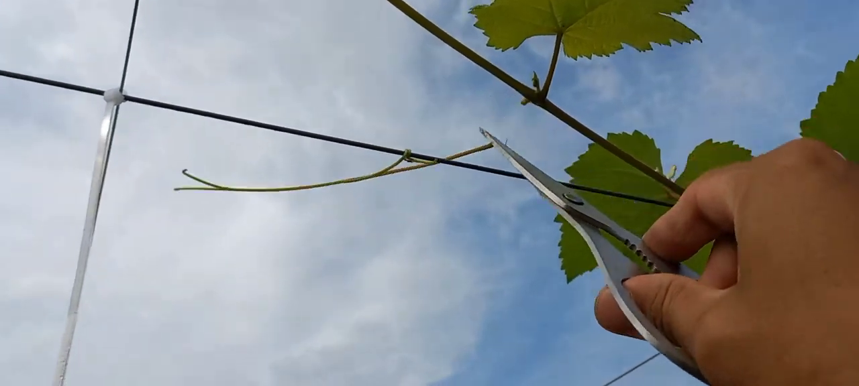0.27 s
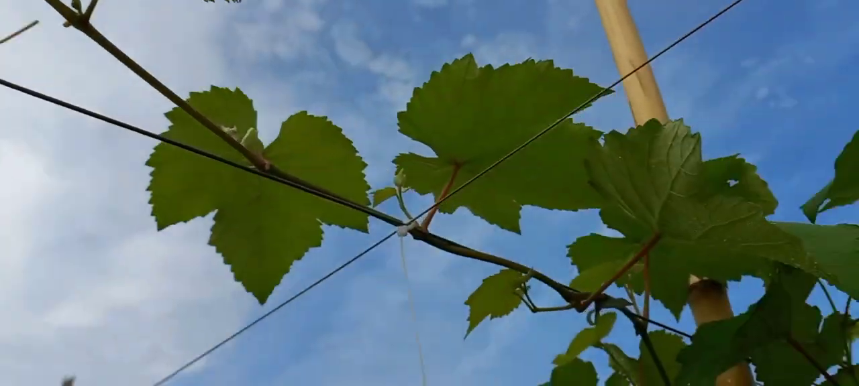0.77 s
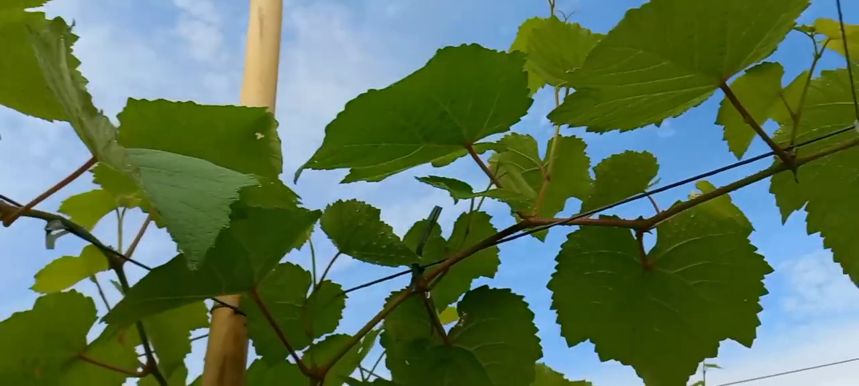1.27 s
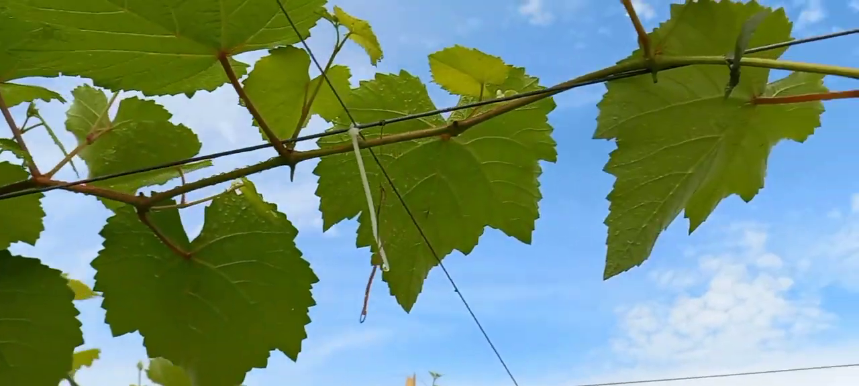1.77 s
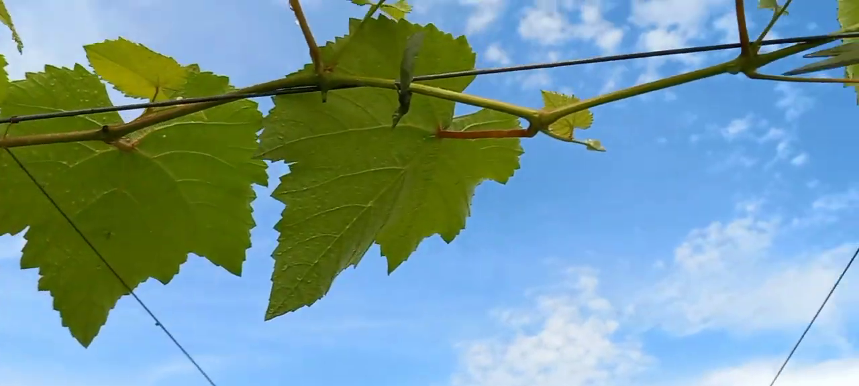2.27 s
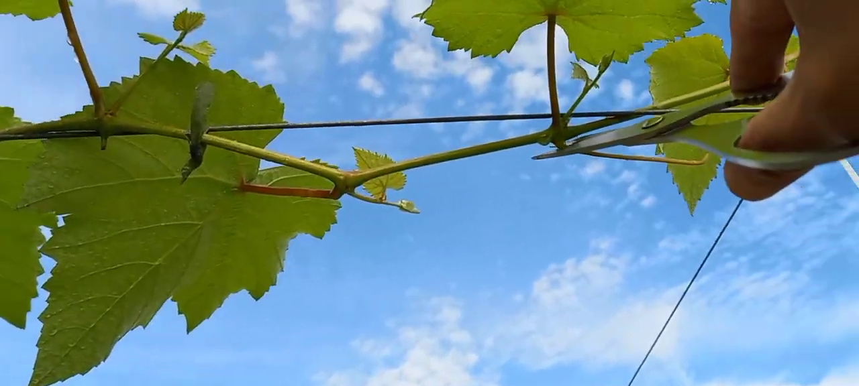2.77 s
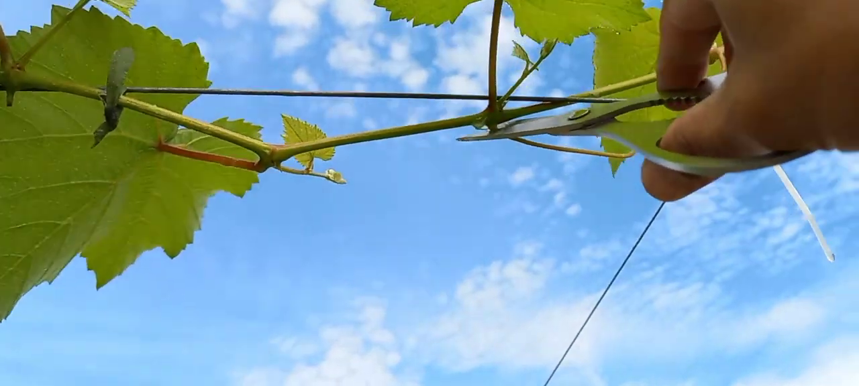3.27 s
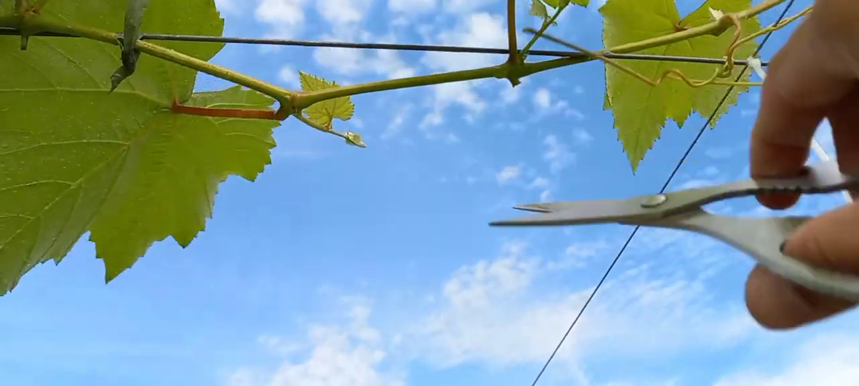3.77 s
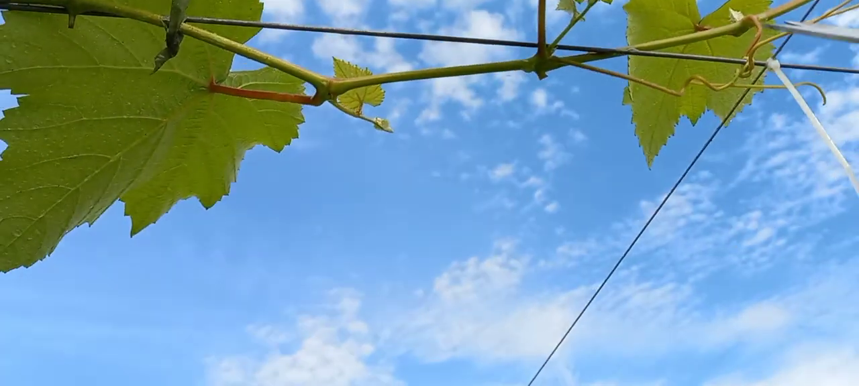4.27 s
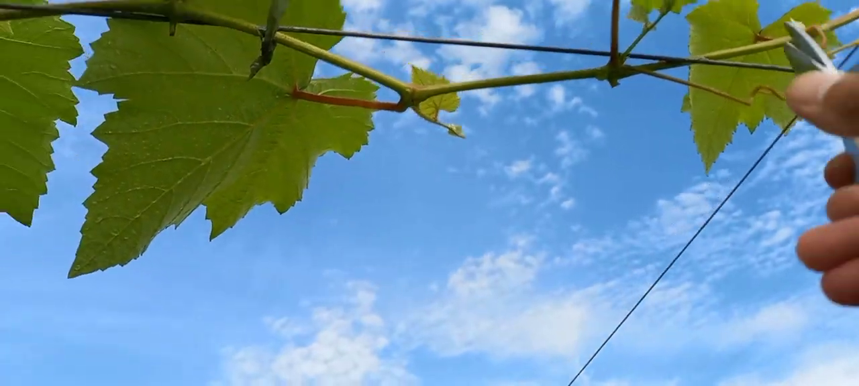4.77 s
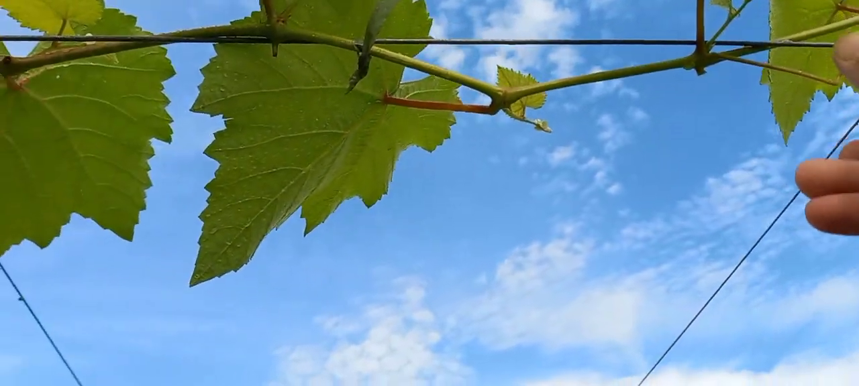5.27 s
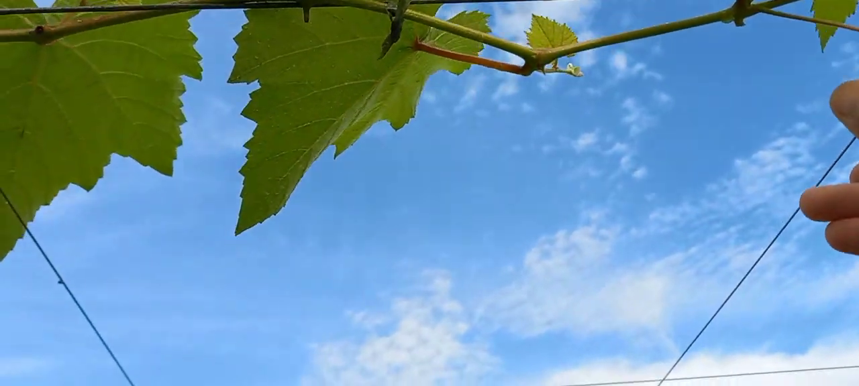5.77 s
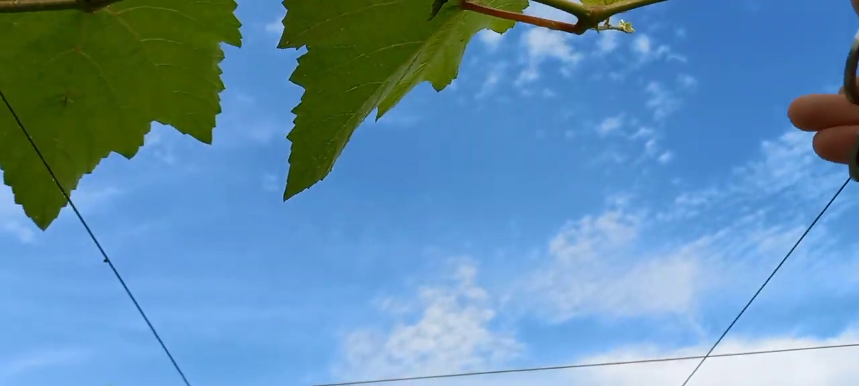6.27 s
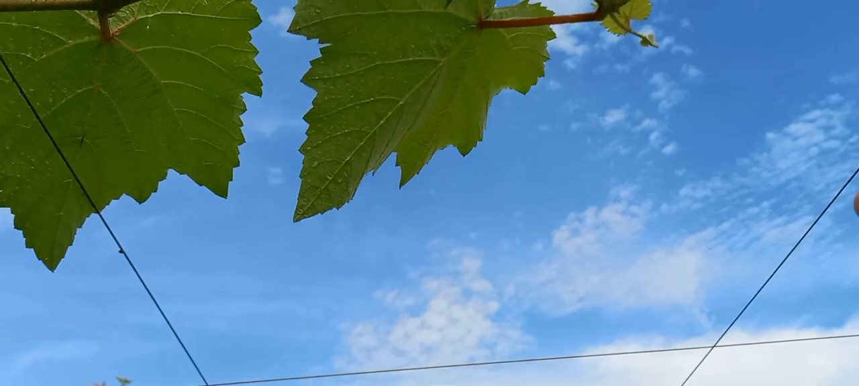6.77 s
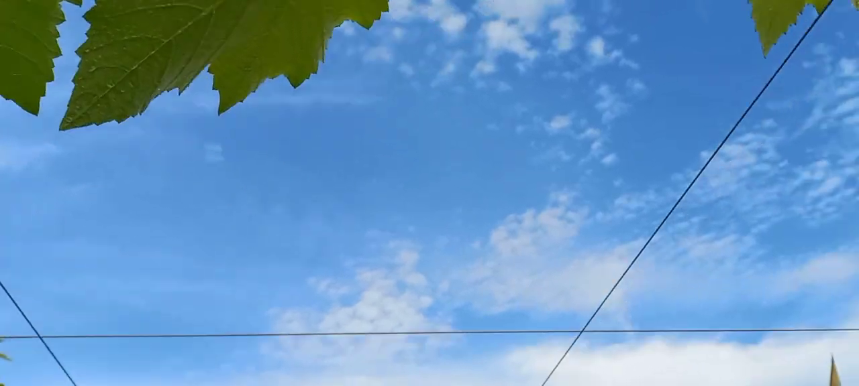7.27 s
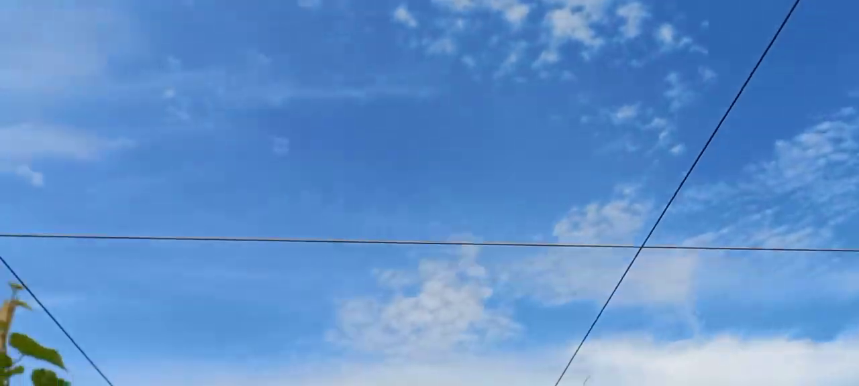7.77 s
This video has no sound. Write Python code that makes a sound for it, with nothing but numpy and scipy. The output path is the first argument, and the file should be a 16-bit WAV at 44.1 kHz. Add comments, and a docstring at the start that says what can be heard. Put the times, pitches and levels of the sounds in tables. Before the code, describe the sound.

Small steel pruning shears work close to the microphone, mostly on the right, outdoors among vines. A quick run of bright, ringing snips and blade scrapes opens, with handle knocks and dull stem thuds. One more sharp snip falls in a quieter middle stretch, where faint birds trill and chip. Then a second busy run of snips and scrapes follows. Leaves rustle now and then over a low rumble, breeze and insect hiss.

```python
"""Pruning shears among the vines

Small steel shears work close by, mostly on the right: the blades rub, bite and snap shut with a bright
ring, the handles knock, the cane thuds and the pivot squeaks. Brushed leaves rustle now and then.
One bird churrs hoarsely far off, a nearer one trills and chips, and a cricket chirps twice.
Behind it all, faint whistles drift over a low rumble, a breeze and the hiss of insects."""
import sys
import numpy as np
from scipy import signal
from scipy.fft import rfft, irfft, next_fast_len
from scipy.io import wavfile
from scipy.ndimage import uniform_filter1d, map_coordinates

SR = 44100
rng = np.random.default_rng(int(sys.argv[2]) if len(sys.argv) > 2 else 0)


def master_out(mix):
    """Clip the mix to full scale and print it as 16-bit PCM to the path in sys.argv[1]."""
    frames = np.transpose(np.atleast_2d(mix))
    ceiling = np.clip(frames, -1, 1)
    pcm = np.round(ceiling * 32767).astype(np.int16)
    wavfile.write(sys.argv[1], SR, pcm)


N = 353461
PADDED = N + 2 * SR  # a track with a spare second at each end
RIGHT_LAG = 17  # samples by which a sound from the far right reaches the left ear later

# Where the shears are. Each row: time in seconds, treble balance (left minus right) in dB.
SHEARS_PAN = [(.16, -3), (.6, -11.5), (1.4, -23), (2.67, -10.5), (3.56, -3), (4.8, 2.5), (6.48, -6),
              (6.85, -8), (7.05, -15), (7.6, -9.5), (8, -5)]
# The bright colour of foliage. Each row: frequency in Hz, level in dB.
LEAF_SPECTRUM = [(2500, -11), (4500, -10), (9000, -11), (12000, -7.5), (13600, -6.5), (15500, -23.5),
                 (16500, -28)]


def amp(db):
    """Decibels to gain."""
    return 10 ** (np.asarray(db) / 20)


def unit(x):
    """Scaled to rms 1."""
    return x / np.sqrt(np.mean(x ** 2) + 1e-30)


def crest(x):
    """Scaled so that the loudest 4 ms have rms 1."""
    return x / np.sqrt(np.max(uniform_filter1d(x ** 2, size=SR // 250)))


def eq(points):
    """Gain against frequency, drawn through (Hz, dB) points on a log axis."""
    hz, db = np.transpose(points)
    return lambda f: amp(np.interp(np.log(f + 1), np.log(hz + 1), db))


def fader(points):
    """A level for every sample, drawn through (seconds, dB) points."""
    return np.interp(np.arange(N) / SR, *np.transpose(points))


def wobble(rate, count=N):
    """A smooth random curve, rate knots a second."""
    knots = rng.standard_normal(int(count * rate / SR) + 4)
    return map_coordinates(knots, [np.arange(count) * rate / SR])


def sine(hz):
    """A tone that follows a pitch curve."""
    return np.sin(2 * np.pi * np.cumsum(hz) / SR)


def filtered(x, response):
    """x shaped by a complex response of frequency."""
    size = next_fast_len(x.shape[-1] + 4096)
    return irfft(rfft(x, size) * response(np.fft.rfftfreq(size, 1 / SR)), size)[..., :x.shape[-1]]


def ringing(modes, scatter_db=2):
    """Response of (Hz, width in Hz, dB) resonances, each excited at a random strength."""
    hz, width, db = np.transpose(modes)[:, :, None]
    polarity = (-1) ** np.arange(len(modes))[:, None]
    gain = polarity * amp(db + scatter_db * rng.standard_normal(db.shape))
    return lambda f: np.sum(gain * 1j * f * width / (hz * hz - f * f + 1j * f * width), axis=0)


def add(out, x, s, pan_db, lag, blur):
    """Mixes x into a padded track at s seconds; the left gets pan_db, lag samples and some scatter."""
    taps = np.r_[1, blur * rng.standard_normal(40) * amp(-np.arange(40) * .6)]
    left = np.convolve(x, taps / np.linalg.norm(taps))[:len(x)]
    start = round(s * SR) + SR
    out[0, start + round(lag):][:len(x)] += left * amp(pan_db)
    out[1, start:][:len(x)] += x


def rush(spectrum, alike, patchy_db):
    """Stereo noise with patches of random gain; the share alike in both ears comes from the right."""
    shape = (3, 257, N // 256 + 3)
    grains = rng.standard_normal(shape) + 1j * rng.standard_normal(shape)
    patches = uniform_filter1d(rng.standard_normal(shape[1:]), size=6, axis=0)
    patches = unit(uniform_filter1d(patches, size=12, axis=1))
    both, left, right = signal.istft(grains * amp(patchy_db * patches), nperseg=512)[1][:, :N]
    shared = np.sqrt(alike) * np.array([np.roll(both, RIGHT_LAG), both])
    diffuse = np.sqrt(1 - alike) * np.array([left, right])
    return unit(filtered(shared + diffuse, eq(spectrum)))


def open_air():
    """The bed: a near-mono rumble, a wide, gently gusting breeze and a smooth far hiss."""
    # The rumble's rise and fall. Each row: time in seconds, level in dB.
    rumble_levels = [(0.0, -60.5), (0.29, -58.5), (1.25, -61.5), (1.43, -66.5), (2.27, -60), (2.94, -66.5),
                     (3.34, -56.5), (6.91, -60), (8.01, -60.5)]
    # The colours of the three layers. Each row: frequency in Hz, level in dB.
    rumble_spectrum = [(21, -51.5), (35, -25), (79, -1), (97, 2.5), (112, -1), (193, -17), (242, -31.5),
                       (330, -25.5), (430, -46), (730, -120)]
    breeze_spectrum = [(120, -19), (200, -4.5), (374, -15.5), (457, -15), (1270, -22.5), (1550, -23.5),
                       (2150, -27), (6000, -42.5), (13200, -120)]
    hiss_spectrum = [(1760, -46), (3300, -8), (4850, -9.5), (6160, -13.5), (7560, -6.5), (9210, -11.5),
                     (14900, -7.5), (15700, -13), (16200, -23)]
    lean_right_db = [[-.8], [.8]]
    rumble_db = fader(rumble_levels) + .6 * wobble(4.7) + lean_right_db
    rumble = amp(rumble_db) * rush(rumble_spectrum, alike=.96, patchy_db=2.5)
    breeze_db = -74 + .8 * wobble(1.5) + lean_right_db
    breeze = amp(breeze_db) * rush(breeze_spectrum, alike=.23, patchy_db=2)
    hiss = amp(-82 + 2.3 * wobble(.678)) * rush(hiss_spectrum, alike=.051, patchy_db=.8)
    return rumble + breeze + hiss


def insects():
    """A chorus of insects blurs into one high, fluttering band of noise."""
    # The chorus swells. Each row: time in seconds, level in dB.
    levels = [(0, -82), (2.8, -84), (4.7, -82), (4.95, -77.5), (5.12, -80.5), (5.3, -83), (6.5, -83),
              (7.35, -78), (8.01, -77)]
    # Its band. Each row: frequency in Hz, level in dB.
    spectrum = [(5600, -42.5), (6300, -9.5), (6900, -8.5), (7500, -4.5), (8000, -12), (8700, -13),
                (9200, -43)]
    return amp(fader(levels) + 1.5 * wobble(70)) * rush(spectrum, alike=.39, patchy_db=.8)


def whistles():
    """Thin tones from far away on the right, wavering in level and pitch."""
    # Each row: start in seconds, length in seconds, pitch in Hz, level in dB.
    tones = [(-.15, .4, 950, -77), (1.5, .38, 1600, -77), (2.42, .28, 1110, -79), (3.5, 2, 1028, -83),
             (4.1, 1.4, 1109, -83), (6.25, .2, 1900, -79)]
    out = np.zeros((2, PADDED))
    for s, length, hz, db in tones:
        n = int(length * SR)
        pitch = hz * (1 + .016 * wobble(80, n))
        swell = np.sin(np.pi * np.arange(n) / n) * amp(db + 3 * wobble(12, n))
        add(out, np.sqrt(2) * swell * sine(pitch), s, pan_db=-9, lag=13, blur=.05)
    return out[:, SR:-SR]


def leaves():
    """Leaves brushed by hand or tendril: a bright hiss and a duller rustle swell together."""
    # Each row: start in seconds, length in seconds, hiss level in dB, rustle level in dB.
    brushes = [(0.14, 0.39, -67, -64.5), (0.876, 0.32, -75, -90), (1.38, 0.37, -82.5, -89),
               (4.19, 0.33, -72.5, -81), (4.79, 0.13, -72, -70.5), (5.3, 0.25, -106, -78.5),
               (6.456, 0.14, -67, -68.5), (6.9, 1.46, -73, -99.5)]
    # The dull colour of twigs. Each row: frequency in Hz, level in dB.
    twig_spectrum = [(200, -3), (450, 2.5), (1100, 5.5), (1700, -8), (3000, -40.5), (5000, -51)]
    t = np.arange(N) / SR
    hiss_gain = rustle_gain = 0
    for s, length, hiss_db, rustle_db in brushes:
        swell = np.sin(np.pi * np.clip((t - s) / length, 0, 1) ** .6) ** .9  # quick rise, slow fade
        hiss_gain += amp(hiss_db) * swell
        rustle_gain += amp(rustle_db) * swell
    hiss = hiss_gain * amp([[-2.5], [1.5]]) * rush(LEAF_SPECTRUM, alike=.073, patchy_db=-5.5)
    return hiss + rustle_gain * rush(twig_spectrum, alike=.47, patchy_db=2)


def blades(pushes, edge_db, scatter_db, tilt_db, damping=1):
    """Steel answers noisy pushes, each at another spot, with a ring and an unpitched edge."""
    # The blades' resonances. Each row: frequency in Hz, width in Hz, level in dB.
    steel_modes = [(4620, 140, -28.5), (5560, 110, -27.5), (6630, 79, -17), (7356, 400, -16.5),
                   (8925, 120, -10.5), (9750, 170, -9.5), (11330, 97, -1.5), (12160, 200, -7),
                   (12920, 200, -9), (14000, 120, -5.5), (14500, 180, -10), (15080, 180, -16.5)]
    # The unpitched edge. Each row: frequency in Hz, level in dB.
    edge_spectrum = [(1500, -46.5), (3200, -41.5), (5000, -32.5), (8000, -34), (12000, -11.5), (14600, -11),
                     (16200, -25.5)]
    edge, sound = eq(edge_spectrum), 0
    for push in pushes:
        ring = ringing(steel_modes * np.array([1, damping, 1]), scatter_db)
        sound += filtered(
            push, lambda f: (ring(f) + amp(edge_db) * edge(f)) * amp(tilt_db * np.log2(f + 2000)))
    return crest(sound)


def snaps():
    """The blades meet: steel rings over a dry crack, the handles knock and the cane thuds."""
    # Each row: time in seconds, ring level in dB, knock level in dB, thud level in dB, knock pitch in Hz.
    hits = [(0.155, -40, -67, -65, 2210), (0.162, -24.5, -38, -42.5, 2090), (0.2248, -52.5, -80, -65, 2300),
            (0.663, -19, -44, -89, 2080), (0.861, -24, -77, -65, 2300), (.901, -27, -47, -78, 2320),
            (1.074, -44.5, -69, -69.5, 2300), (1.1091, -19, -37.5, -59, 2400),
            (2.672, -88, -61.5, -76, 1780), (3.562, -16.5, -36, -42, 1972), (4.009, -76, -73.5, -71, 2310),
            (4.8042, -68.5, -66, -56.5, 2030), (6.4796, -17.5, -54, -47.5, 2290),
            (6.819, -51.5, -68, -71, 2280), (7.062, -33.5, -45, -50, 1880), (7.083, -14.5, -40, -55, 2600),
            (7.283, -18, -44, -88, 2450), (7.465, -43.5, -81, -62, 2300), (7.6209, -29, -74.5, -86.5, 2290),
            (7.995, -31.5, -79, -65.5, 2280)]
    # The handles' resonances. Each row: pitch and width as multiples of the knock pitch, level in dB.
    handle_modes = [(.7, .22, -16), (1, .13, 0), (1.55, .4, -15)]
    # Resonances of hand and cane. Each row: frequency in Hz, width in Hz, level in dB.
    cane_modes = [(223.3, 77, -1.5), (756, 350, -0.5), (1200, 220, 0.5)]
    crack_colour = eq([(3000, -20), (5000, -13), (8000, -2), (11000, -20.5)])
    out, t = np.zeros((2, PADDED)), np.arange(SR // 8) / SR
    for s, ring_db, knock_db, thud_db, knock_hz in hits:
        pan_db = np.interp(s, *np.transpose(SHEARS_PAN))
        lag = -pan_db  # farther to the right: later on the left
        low_pan_db = .35 * pan_db  # lower tones bend round to the far ear
        cut = thud_db > ring_db - 30  # a stem between the blades dulls the ring and broadens the knock
        blow = amp(-60 * np.clip(t - .001, 0, None) / .01) * (1 - np.exp(-t / .0004))  # 1 ms of contact
        shiver = amp(-24 - 60 * t / .05 + 3 * wobble(300, len(t)))  # loose parts shake on
        push = (blow + shiver) * rng.standard_normal((2, len(t)))
        crack = crest(filtered(push[1], crack_colour))
        crack *= amp(ring_db - 21) + amp(thud_db + 4)  # crunchier when the cane is hit
        canopy = unit(filtered(rng.standard_normal((2, len(t))), eq(LEAF_SPECTRUM)))
        echo = amp(ring_db - 39 - 60 * t / .2) * canopy  # the leaves scatter the snap
        ring = blades(push[:1], edge_db=11, scatter_db=2, tilt_db=-5 if cut else 0)
        add(out, amp(ring_db) * ring, s - .0006, pan_db, lag, blur=.5)
        add(out, crack, s - .0006, low_pan_db, lag, blur=.5)
        out[:, round(s * SR) + SR:][:, :len(t)] += echo
        cane_rattle = amp(-27 - 60 * t / .09) * rng.standard_normal(len(t))
        jolt = amp(-60 * t / .0082) + cane_rattle
        handle = ringing(handle_modes * np.array([knock_hz, knock_hz * (1.6 if cut else 1), 1]))
        knock = amp(knock_db) * crest(filtered(jolt, handle))
        add(out, knock, s + .00033, low_pan_db, lag, blur=.12)
        thud = amp(thud_db) * crest(filtered(jolt, ringing(cane_modes)))
        add(out, thud, s + .00032, pan_db=-4, lag=lag, blur=.12)
    return out[:, SR:-SR]


def rubs():
    """Blade scrapes on blade in jerky strokes: the edge catches and slips, stirring a ring and a rasp."""
    # Each row: start in seconds, length in seconds, ring level in dB, change over the stroke in dB,
    # treble tilt in dB per octave, rasp level in dB.
    strokes = [(0.603, 0.01, -56.5, -4, -10, -85), (0.62, 0.014, -32, 1.5, -0.5, -66),
               (0.8133, 0.025, -32.5, 1, 3, -57), (0.842, 0.008, -39.5, -3, -8, -56),
               (1.038, 0.027, -37, -1, 2, -55.5), (1.073, 0.012, -41.5, -2.5, 2, -56),
               (1.278, 0.018, -35, -3, -3.5, -55.5), (1.373, 0.026, -52, 12, -8.5, -68),
               (3.55, 0.0049, -48, 6, -7.5, -54.5), (6.484, .016, -40.5, -13, -1, -52),
               (6.718, 0.033, -39.5, 1, -2.5, -70), (6.744, 0.0174, -39, 8, -2.5, -69),
               (6.848, 0.045, -50.5, 9, -9, -65.5), (7.003, 0.038, -28, 2, -2.5, -50),
               (7.204, 0.032, -30.5, -11.5, 2.5, -59.5), (7.24, 0.016, -33.5, 4.5, -2, -52.5),
               (7.262, .006, -50.5, 0, 0, -57), (7.424, 0.048, -35, -7, -3.5, -56.5),
               (7.509, 0.041, -53, 1.5, -3, -72), (7.602, 0.016, -42, 8, 2, -67),
               (7.81, 0.04, -44.5, -15, -5, -81), (7.925, 0.049, -48.5, 1, -1, -75)]
    # The broad body of the scrape. Each row: frequency in Hz, width in Hz, level in dB.
    rasp_modes = [(2300, 900, -4), (4600, 1700, 0.5), (6900, 1200, 2)]
    bite_s, release_s = .004, .03
    out, t = np.zeros((2, PADDED)), np.arange(SR // 8) / SR
    for s, length, ring_db, change_db, tilt_db, rasp_db in strokes:
        pan_db = np.interp(s, *np.transpose(SHEARS_PAN))
        progress = np.clip(t / length, 0, 1)
        release_db = -60 * np.clip(t - length, 0, None) / release_s
        judder_db = -wobble(45, len(t))
        stroke = np.clip(t / bite_s, 0, 1) * amp(change_db * progress + release_db + judder_db)
        rough_db = 3.5 * wobble(600, len(t))
        ticks_db = 2.5 * np.repeat(rng.exponential(size=len(t) // 16 + 1), 16)[:len(t)]
        grit = amp(rough_db + ticks_db)
        push = stroke * grit * rng.standard_normal(len(t))
        # The contact slides across three spots along the blades.
        spots = np.clip(1 - np.abs(2 * progress - np.arange(3)[:, None]), 0, 1) ** .5
        ring = blades(push * spots, edge_db=-1, scatter_db=6, tilt_db=tilt_db, damping=.58)
        add(out, amp(ring_db) * ring, s, pan_db, lag=-pan_db, blur=.5)
        friction = stroke * np.sqrt(grit) * rng.standard_normal(len(t))
        rasp = crest(filtered(friction, ringing(rasp_modes)))
        add(out, amp(rasp_db) * rasp, s, .35 * pan_db, lag=-pan_db, blur=.12)
    return out[:, SR:-SR]


def squeaks():
    """The pivot gives short, hoarse tones, unsteady in pitch and level."""
    # Each row: start in seconds, length in seconds, pitch in Hz, level in dB.
    tones = [(1.282, 0.042, 2200, -67), (3.087, .02, 10320, -63), (6.843, 0.021, 15150, -45),
             (7.022, 0.055, 3340, -56.5)]
    out = np.zeros((2, PADDED))
    for s, length, hz, db in tones:
        t = np.arange(int(length * SR)) / SR
        pitch = hz + 45 * wobble(250, len(t))
        swell = np.sin(np.pi * t / length) ** .5 * amp(db + 5 * wobble(200, len(t)))
        add(out, swell * sine(pitch), s, pan_db=-5, lag=13, blur=.05)
    return out[:, SR:-SR]


def bird_voice(notes, hoarse=False):
    """Gliding whistles: a trill above 15 a second chops the note, and above 40 sweeps each pulse too."""
    sweep_hz, jitter_hz, sharpness, lag = (800, 150, 2, RIGHT_LAG) if hoarse else (400, 90, 4, -15)
    out = np.zeros((2, PADDED))
    for s, length, start_hz, mid_hz, end_hz, db, trill in notes:
        t = np.arange(int(length * SR)) / SR
        progress, beat, fast = t / length, (t * trill) % 1, trill > 40
        glide = np.polyval(np.polyfit([0, .5, 1], [start_hz, mid_hz, end_hz], deg=2), progress)
        pitch = glide - sweep_hz * (beat - .5) * fast + jitter_hz * wobble(300, len(t))
        swell = np.sin(np.pi * progress) ** .8
        if trill > 15:
            swell *= np.sin(np.pi * beat) ** (sharpness if fast else 1.5) * amp(4 * wobble(60, len(t)))
        if hoarse:
            swell *= .6 + wobble(450, len(t))  # the voice breaks up into noise
        add(out, amp(db) * unit(swell * sine(pitch)), s, pan_db=1.2, lag=lag, blur=.1)
    return out[:, SR:-SR]


def churrs():
    """The far bird's hoarse trills, most of them sliding down."""
    # Each row: start in seconds, length in seconds, first pitch in Hz, glide in Hz per second,
    # level in dB before the loss over distance.
    calls = [(2.614, .05, 3700, 17993, -74.5), (2.632, 0.062, 3340, -9500, -76),
             (3.045, 0.2, 4650, -10500, -74), (3.581, 0.11, 4010, -7500, -67.5)]
    pulses_per_s = 49
    notes = [(s, length, hz, hz + glide * length / 2, hz + glide * length, db, pulses_per_s)
             for s, length, hz, glide, db in calls]
    return bird_voice(notes, hoarse=True)


def peeps():
    """The far bird's clear double peep on one pitch, after each falling trill."""
    # Each row: start in seconds, level in dB.
    calls = [(2.747, -81.5), (3.251, -77.5), (3.744, -80)]
    length, hz = .081, 2640
    return bird_voice([(s, length, hz, hz, hz, db, 2 / length) for s, db in calls])


def near_bird():
    """A clear voice sings two short motifs among single notes."""
    # A rising trill with an upward chip, a high-low call, and the single notes. Each row: start and
    # length in seconds, first, middle and last pitch in Hz, level in dB, trill pulses per second.
    trill_and_chip = [(0, 0.093, 3280, 3584, 4450, -0.5, 64), (0.128, .032, 1990, 2530, 3100, -10, 0)]
    high_low = [(0, 0.053, 3890, 3990, 3870, 1, 47.5), (0.049, 0.037, 2910, 3270, 3060, -2.2, 0)]
    single_notes = [(4.199, 0.15, 3180, 3910, 3570, -73, 52), (4.563, 0.028, 2650, 2425, 2230, -68, 0),
                    (4.597, 0.098, 3350, 3840, 3620, -71, 54), (5.201, 0.024, 3090, 3750, 4000, -71, 0),
                    (5.472, 0.038, 3170, 2700, 2540, -74, 0), (7.665, 0.026, 3170, 3320, 3500, -72, -2),
                    (7.934, 0.042, 3620, 3160, 3800, -67, 2)]
    # When each motif is sung. Each row: start in seconds, pitch factor, gain in dB.
    trill_cues = [(4.66, 0.973, -61), (5.559, 1.015, -60.5)]
    high_low_cues = [(5.79, 0.96, -79.5), (5.953, 0.98, -78), (6.123, .97, -79.5)]
    notes = [(s + after, length, first * shift, mid * shift, last * shift, gain_db + db, trill)
             for cues, motif in ((trill_cues, trill_and_chip), (high_low_cues, high_low))
             for s, shift, gain_db in cues
             for after, length, first, mid, last, db, trill in motif]
    return bird_voice(notes + single_notes)


def birds():
    """Both birds with the field's short echo; the churrs are turned down and more smeared."""
    hoarse = churrs()
    clear = peeps() + near_bird()
    t, echo_s = np.arange(SR // 4) / SR, .2
    tail = rng.standard_normal((2, len(t))) * amp(-60 * t / echo_s) * (t > .012)
    send = amp(-11) * clear + amp(-6) * hoarse
    echo = signal.fftconvolve(send, tail / np.linalg.norm(tail[0]), axes=1)[:, :N]
    return clear + amp(-5) * hoarse + echo


def cricket():
    """A near cricket drives fast clicks into one wing resonance."""
    # Each row: start in seconds, length in seconds, level in dB.
    chirps = [(2.731, .155, -83), (7.29, 0.17, -80)]
    wing_hz, width_hz, clicks_per_s = 7600, 450, 170
    wing = ringing([(wing_hz, width_hz, 0)], scatter_db=0)
    out = np.zeros((2, PADDED))
    for s, length, db in chirps:
        t = np.arange(int(length * SR)) / SR
        clicks = np.sin(np.pi * t * clicks_per_s) ** 16 * rng.standard_normal(len(t))
        chirp = unit(filtered(filtered(clicks, wing), wing))
        add(out, amp(db) * chirp, s, pan_db=-1, lag=0, blur=.3)
    return out[:, SR:-SR]


def scene():
    """The shears up close and the field around them, in stereo."""
    shears = snaps() + rubs() + squeaks()
    return shears + birds() + whistles() + cricket() + leaves() + open_air() + insects()


def record(dry):
    """The microphone lifts the mix by 2 dB, rolls off above 15.3 kHz and cuts off at 16.8 kHz."""
    rolloff = eq([(15300, 2), (15900, -22.5)])
    return filtered(dry, lambda hz: rolloff(hz) * (hz < 16800))


dry = scene()
out = record(dry)
master_out(out)
```